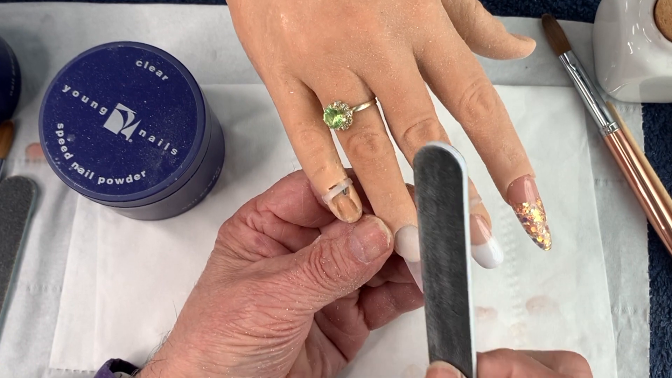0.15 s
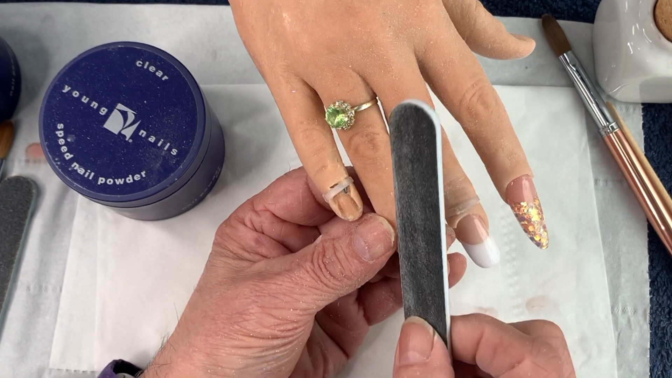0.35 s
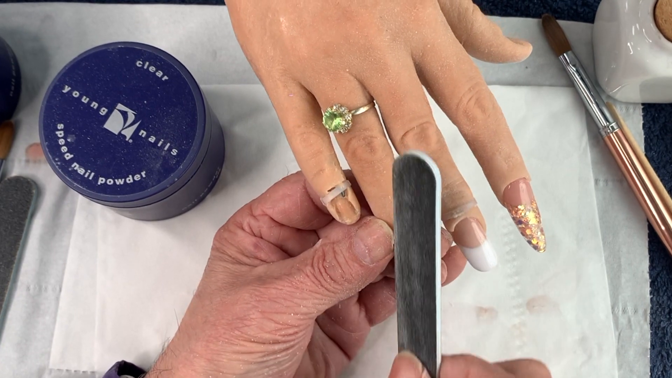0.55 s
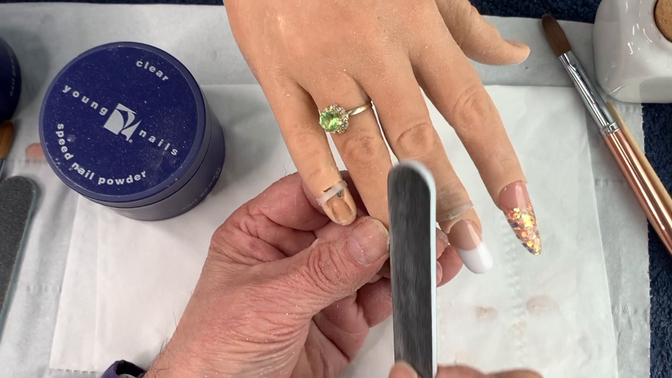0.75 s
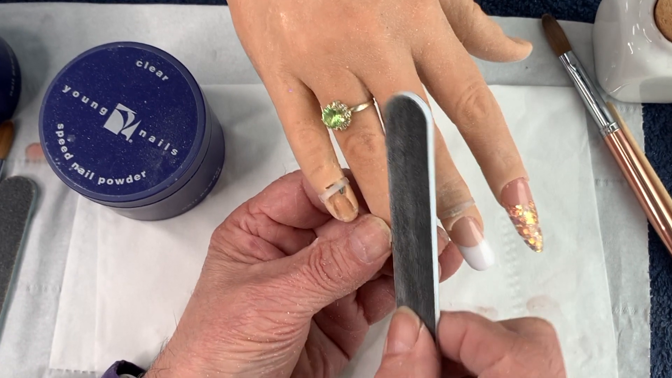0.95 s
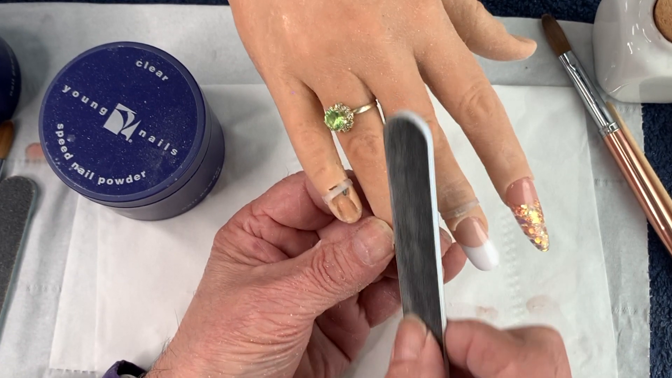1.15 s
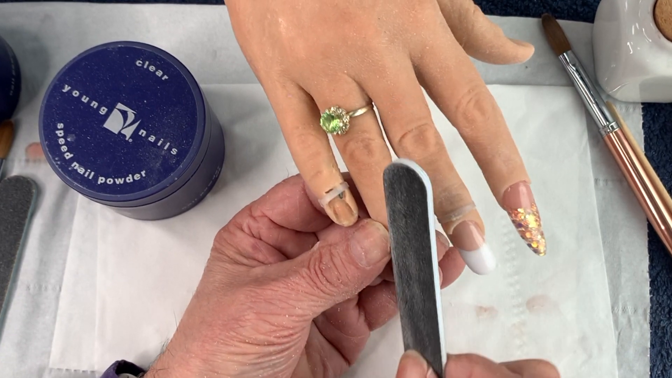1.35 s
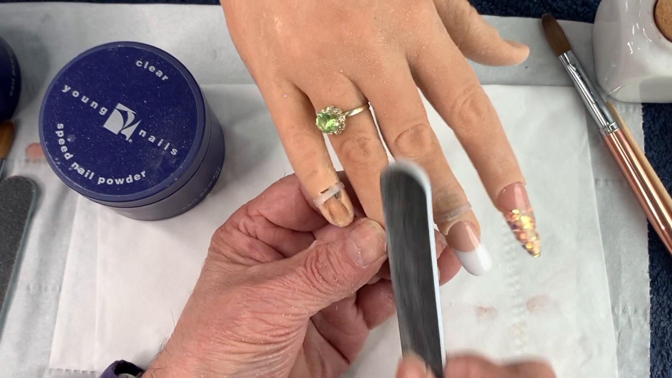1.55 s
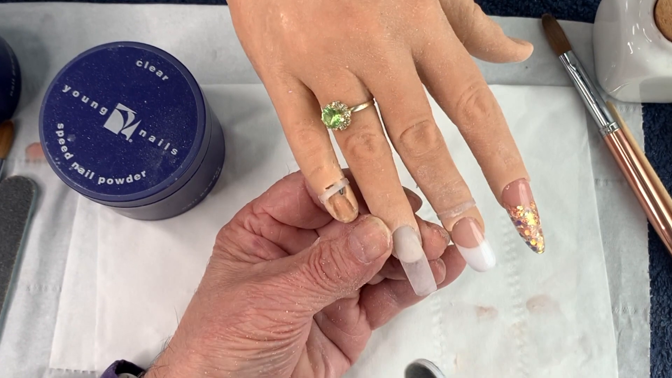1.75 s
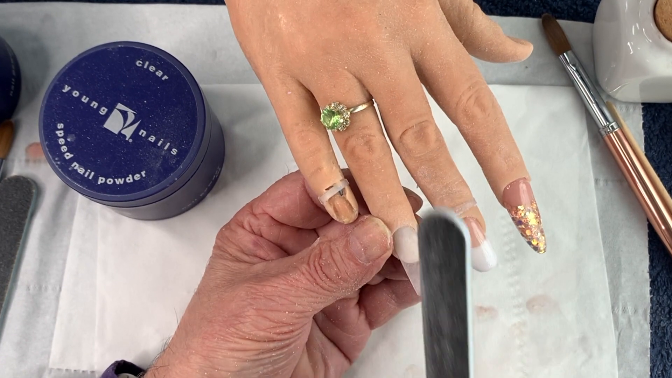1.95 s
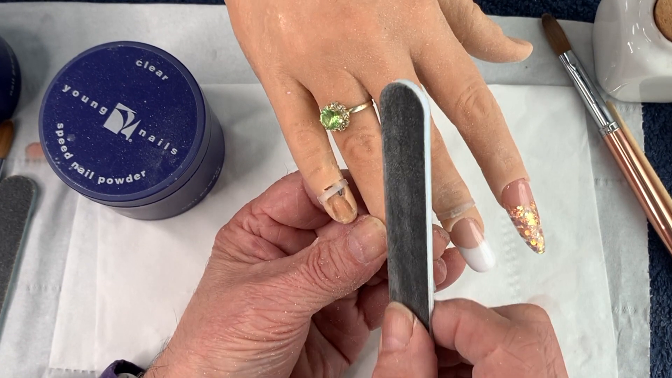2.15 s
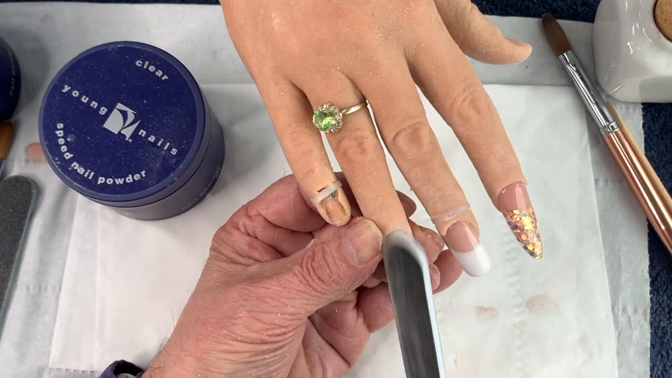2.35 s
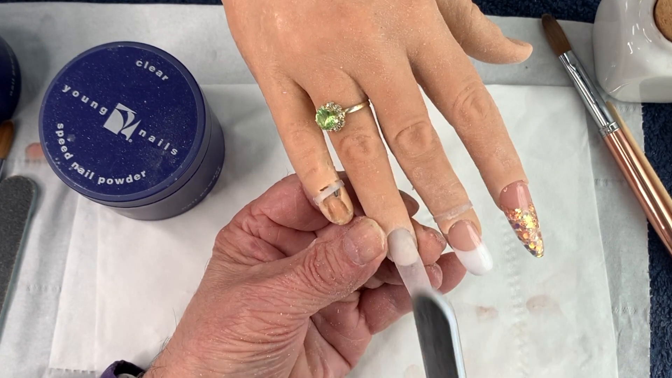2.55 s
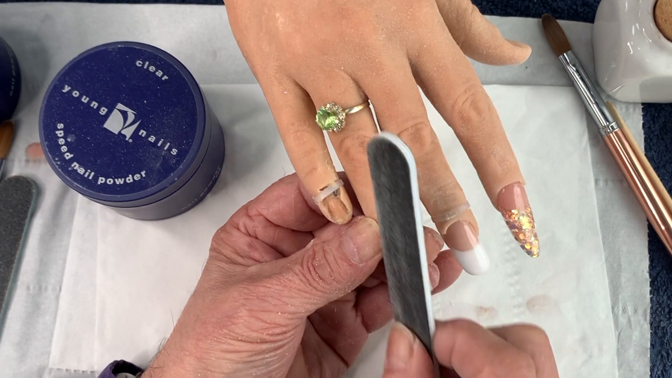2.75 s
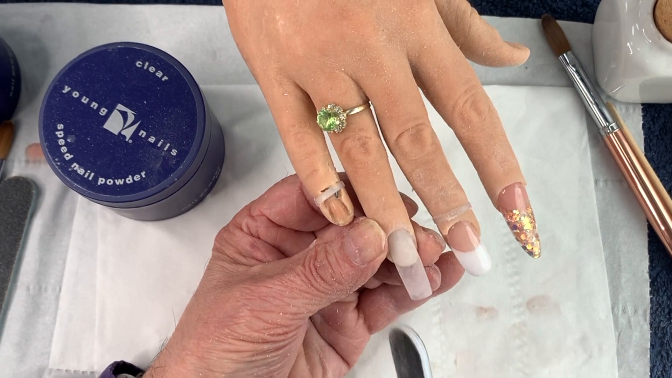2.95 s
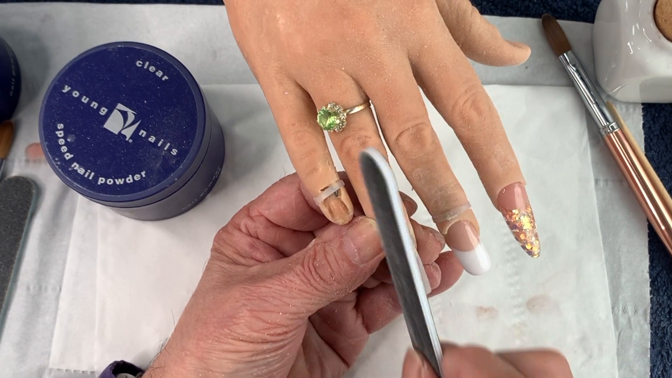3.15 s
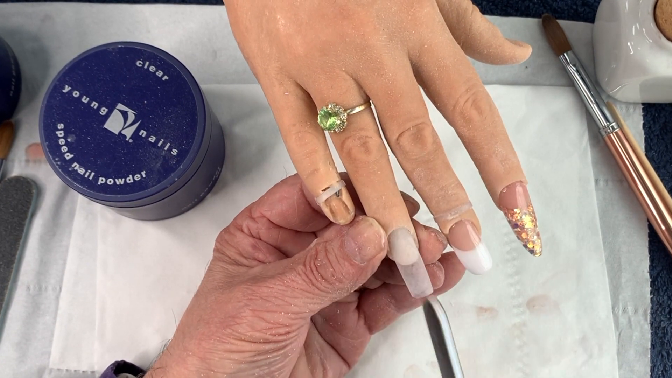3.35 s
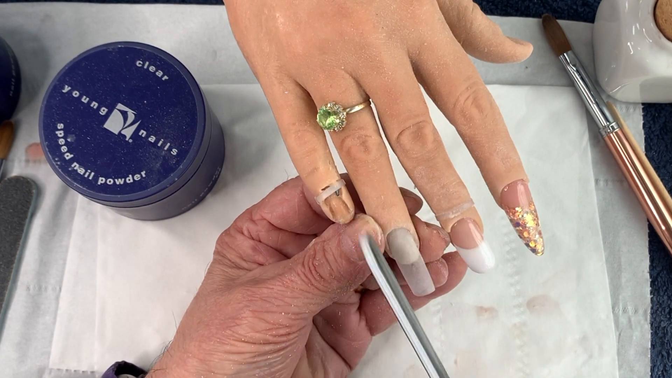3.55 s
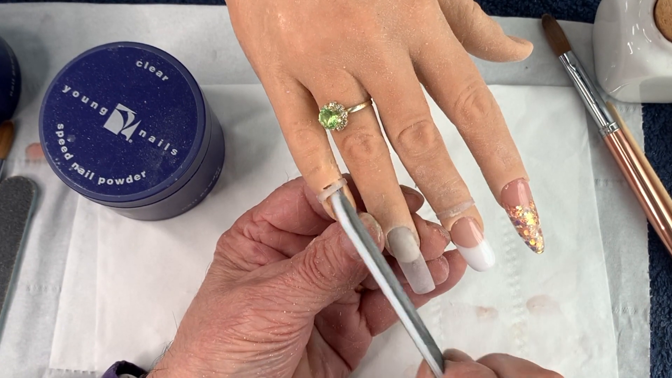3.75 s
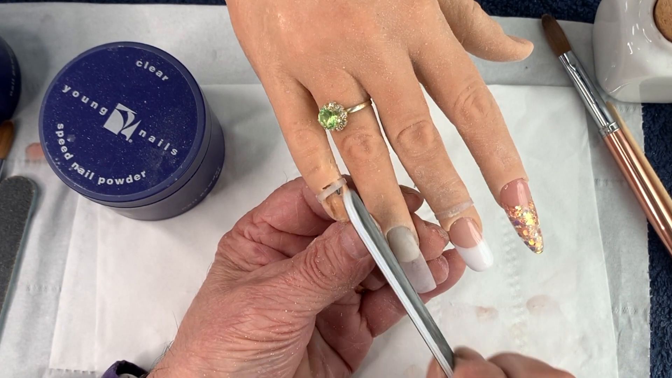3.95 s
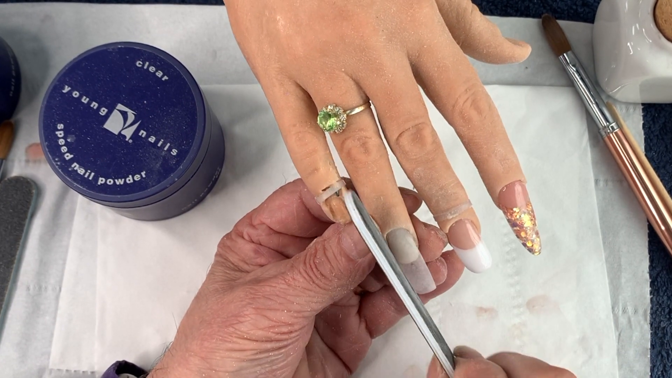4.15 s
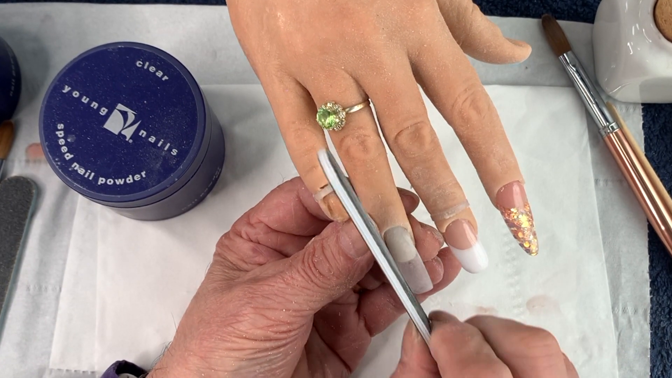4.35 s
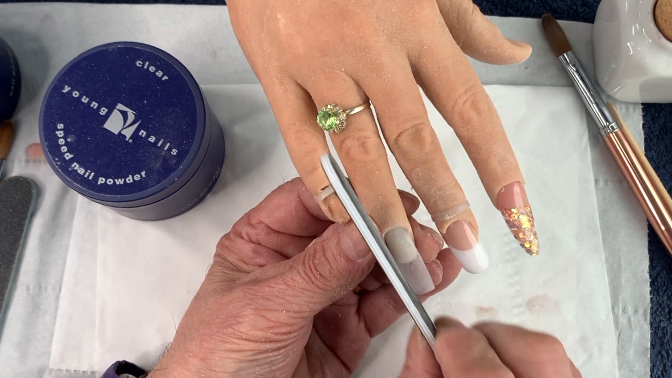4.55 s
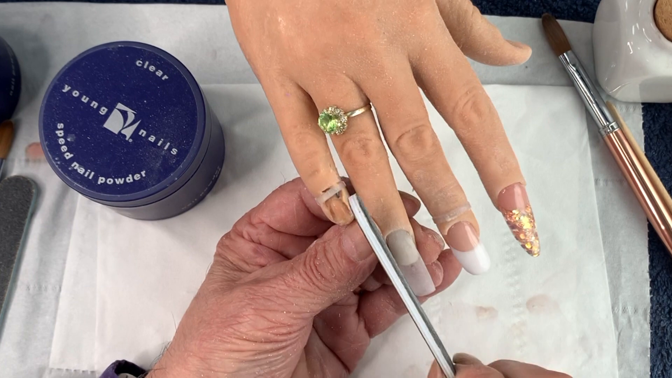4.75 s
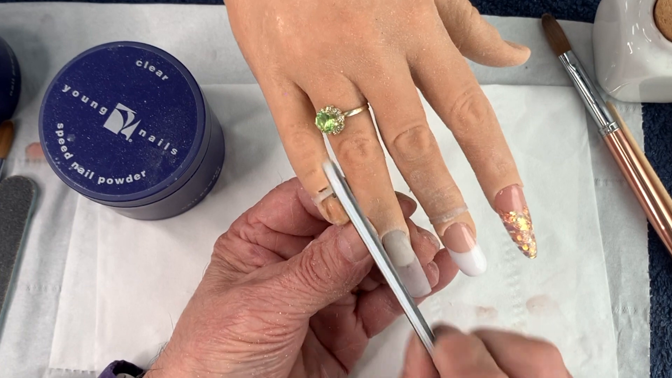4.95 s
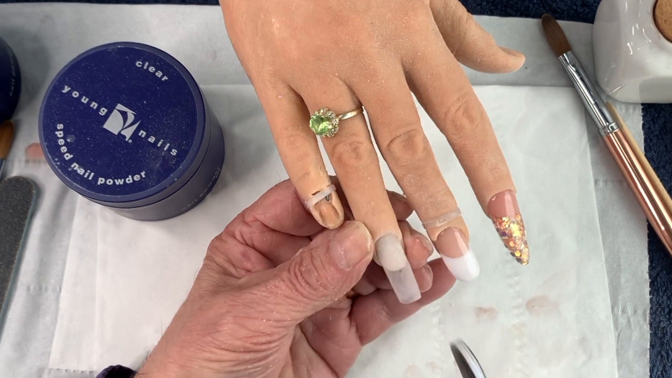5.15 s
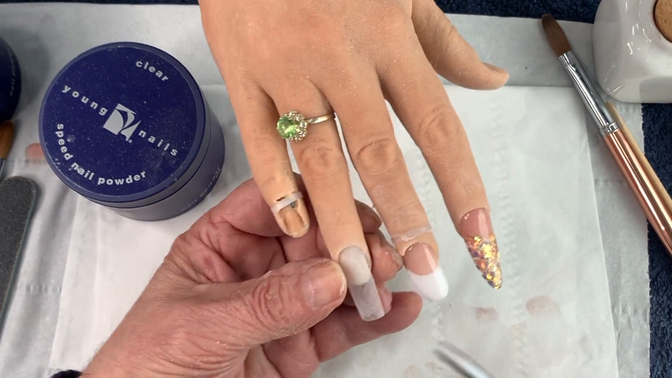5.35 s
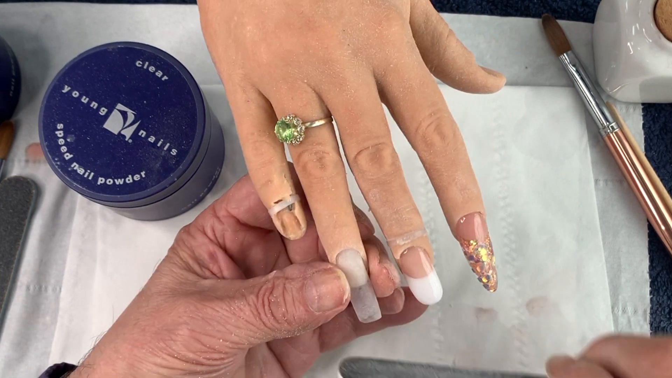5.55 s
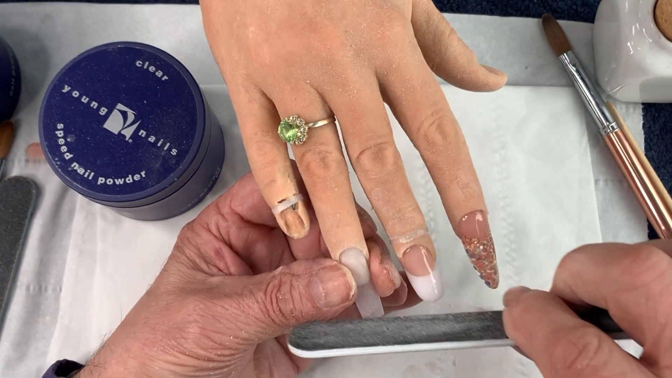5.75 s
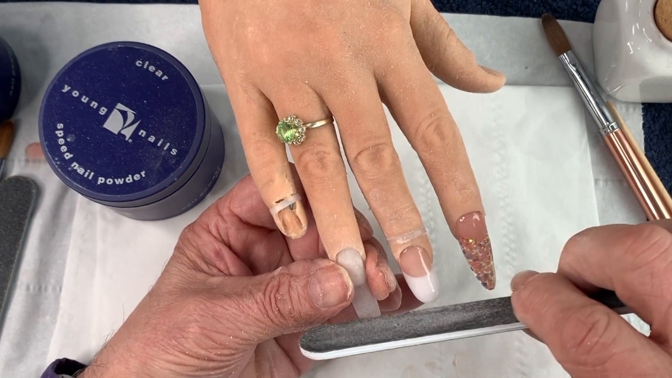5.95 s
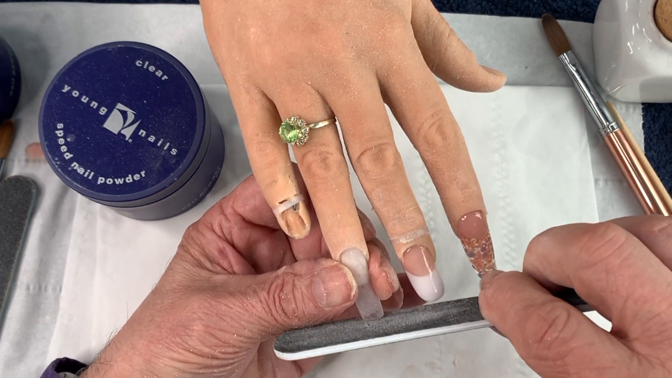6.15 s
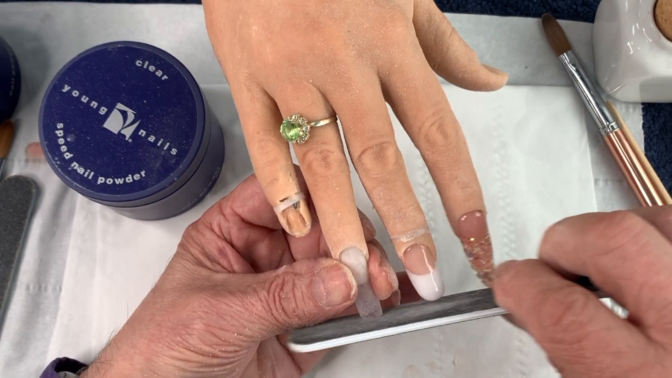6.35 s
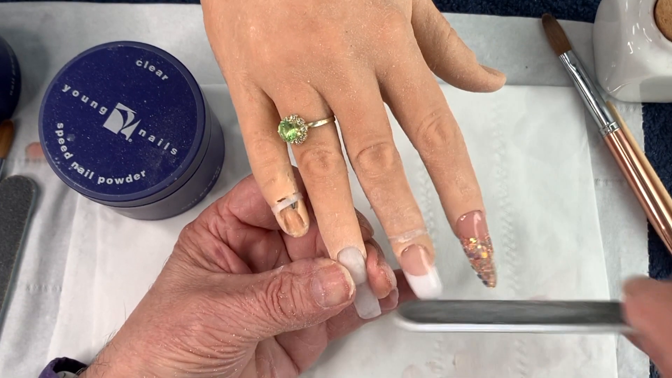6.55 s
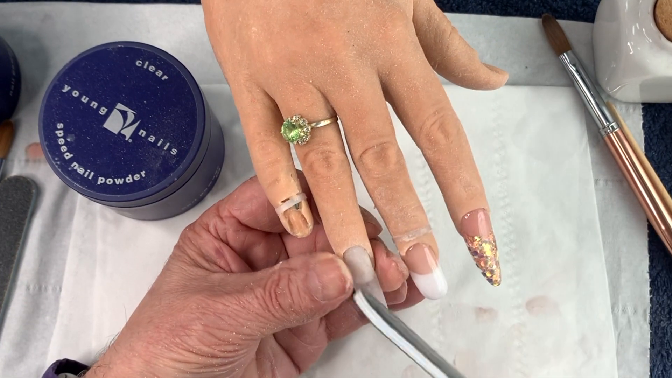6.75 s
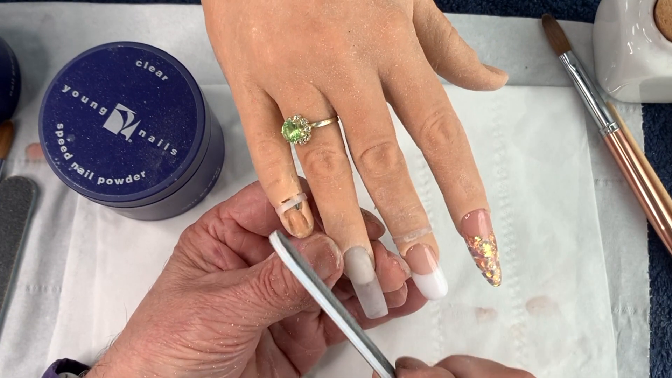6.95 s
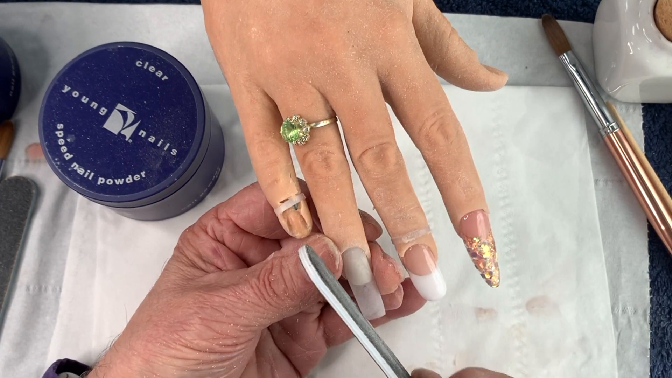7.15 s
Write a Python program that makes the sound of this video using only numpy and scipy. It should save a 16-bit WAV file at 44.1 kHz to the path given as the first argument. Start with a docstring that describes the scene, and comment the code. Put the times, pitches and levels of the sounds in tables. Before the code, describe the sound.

An emery board rasps quickly back and forth on an acrylic nail, with soft knocks from the practice hand's finger. The run ends in a sharp little snap, and three separate sweeps follow. A second quick run builds, then skin rubs briefly, and a few more strokes scratch at the tip, the last ones very light. The microphone is close, in a small room with faint traffic drone, rumble and hiss.

```python
"""Filing an acrylic nail

An emery board files a nail on a practice hand, close to two microphone ports in a small room.
Grit scratches in quick strokes, snaps, and chatters at the edge; the finger knocks softly at turns.
Skin rubs on rubber and board between runs. Traffic drones through the walls, over low rumble and hiss."""
import sys
import numpy as np
from scipy import signal
from scipy.fft import rfft, irfft, next_fast_len
from scipy.io import wavfile

SR = 44100
rng = np.random.default_rng(int(sys.argv[2]) if len(sys.argv) > 2 else 0)


def store_wav(level_fs):
    """Save 16-bit WAV to argv[1]."""
    pcm = np.round(np.clip(np.atleast_2d(level_fs), -1, 1) * 32767)
    wavfile.write(sys.argv[1], SR, pcm.T.astype(np.int16))


N = 317564
BAND_LIMIT_HZ = 15800
RIPPLE_HZ = np.linspace(0, BAND_LIMIT_HZ, 70)  # knots of a random ripple: the board's small modes
PUSH, PULL, SWEEP = "push", "pull", "sweep"  # a sweep runs off the nail

# Engines. Each row: time in seconds, firing rate in Hz, fundamental in dB, overtones in dB.
ENGINES = [(0, 88.54, -75, -69), (.55, 92.33, -67.5, -63.5), (1.15, 93.8, -79, -66.5),
           (1.45, 85.36, -64.5, -67), (1.9, 69.97, -81, -74.5), (3.5, 74.46, -77, -77.5),
           (4.4, 77.36, -72, -78.5), (5.35, 72.24, -76.5, -73.5), (5.8, 69.83, -81, -65.5),
           (6.3, 66.5, -91, -71), (7.2, 67.8, -85.5, -78.5)]
# Spectra of the low rumble and the faint background hiss. Each row: frequency in Hz, gain in dB.
RUMBLE_SPECTRUM = [(25, -34), (40, -19.5), (55, -9), (80, -11.5), (102, -22), (126, -9), (226, 1),
                   (323, -11), (356, -6), (390, -14.5), (540, -23.5), (750, -25), (1200, -37), (2600, -71)]
HISS_SPECTRUM = [(400, 7.5), (800, 3), (1500, -1.5), (3000, -4), (4300, -11), (5500, -17.5), (10000, -21),
                 (15500, -26.5)]
# Low rumble, with a soft thud near 5.3 s as the practice hand shifts.
# Each row: time in seconds, relative level in dB.
RUMBLE_LEVEL = [(0, -67), (1.3, -63), (1.9, -69.5), (4.2, -68.5), (5.3, -65), (5.8, -70.5), (7.2, -70)]
# The hiss rises after the strokes and fades in pauses. Each row: time in seconds, level in dB.
HISS_LEVEL = [(0, -72), (1.7, -69.5), (2.1, -78.5), (3.3, -73), (3.7, -76.5), (5.4, -71.5), (5.8, -80.5),
              (6.1, -82.5), (6.7, -76), (7.2, -92)]
# Background noise between the ports. Each row: frequency in Hz, coherence from 0 to 1.
COHERENCE = [(60, 1), (150, 0.998), (300, .8), (600, 0.084), (2000, 0.16), (8000, 0.1)]
# File strokes. Each row: start and end in seconds, relative level in dB, motion.
STROKES = [(0.188, .36, -69.5, PULL), (0.357, 0.493, -43.5, PUSH), (0.509, 0.613, -43, PULL),
           (0.638, 0.745, -41, PUSH), (0.769, 0.885, -38, PULL), (.907, 1.028, -41, PUSH),
           (1.046, 1.156, -40.5, PULL), (1.183, 1.295, -43.5, PUSH), (1.322, 1.422, -43, PULL),
           (1.464, 1.607, -34, SWEEP), (2.181, 2.385, -38.5, SWEEP), (2.699, 2.887, -38.5, SWEEP),
           (3.137, 3.317, -38, SWEEP), (3.721, 3.836, -56.5, PUSH), (3.848, 4.03, -48, PULL),
           (4.023, 4.16, -49, PUSH), (4.164, 4.296, -44, PULL), (4.3, 4.431, -46, PUSH),
           (4.445, 4.585, -42.5, PULL), (4.574, 4.727, -42.5, PUSH), (4.737, 4.868, -42, PULL),
           (4.885, 5.053, -37, SWEEP), (6.158, 6.266, -47, PUSH), (6.27, 6.382, -47, PULL),
           (6.378, 6.535, -40, PUSH), (7.034, 7.154, -55.5, PUSH), (7.161, 7.266, -57, PULL)]
# Each motion: share elapsed at top speed, speed exponent, rasp in dB, treble in dB, glide in octaves.
# The grip's swing scales the last three.
MOTIONS = {PUSH: (0.56, 2, -0.5, -1, 0.01), PULL: (.48, 1.11, -2.2, 1.1, .2),
           SWEEP: (0.8, 0.37, -1, 0.5, -0.12)}
# Where the file lies on the nail. Each row: start in seconds, grip.
GRIP_TIMES = [(0, "top"), (3, "side"), (6, "tip")]
# Each grip: board's ring in Hz, ring gain in dB, swing factor, knock tilt in dB per octave.
GRIPS = {"top": (2300, -2, .9, 1), "side": (3724, 1.5, 1.8, -3.5), "tip": (2500, -2.5, 0.64, -2.5)}
# Rasp of the nail by grip. Each row: frequency in Hz, gain in dB.
TOP_SPECTRUM = [(300, -32), (900, -23.5), (1450, -20), (1950, -6), (2700, -6), (3200, -3), (4250, -0.5),
                (4950, -4.5), (5700, -5), (6700, -3.5), (7600, -8.5), (11500, 0), (13500, -6),
                (15600, -19.5)]
SIDE_SPECTRUM = [(300, -22.5), (900, -26), (1450, -27), (1950, -10.5), (2700, -12.5), (3200, -11),
                 (4250, -1), (4950, -5.5), (5700, -6), (6700, -9), (7600, -17), (11500, -4.5), (13500, -15),
                 (15600, -23.5)]
TIP_SPECTRUM = [(300, -17), (680, -9.5), (920, -14.5), (1250, -17), (1600, -12), (2050, -1.5), (2700, 1.5),
                (3300, -3.5), (4250, -3), (4950, -8.5), (5700, 0), (7600, -5), (13000, -1), (15600, -16.5)]
# Grit snaps and touchdowns. Each row: time in seconds, relative peak in dB, treble in dB.
SNAPS = [(0.216, -60, -21), (.378, -48, 3), (1.6159, -14.5, 10), (3.1534, -36, -18), (3.1869, -32.5, -19),
         (3.2754, -21.5, 3), (3.2992, -17, 1), (3.53, -55, -3), (3.5492, -59, -0.5), (4.9936, -32, -2),
         (5.9415, -55, -4), (6.4225, -28.5, -6), (6.5096, -29, -.5)]
# The finger rocks as the file turns. Each row: time in seconds, relative peak in dB.
KNOCKS = [(0.527, -53.5), (0.785, -44.5), (0.881, -47.5), (1.062, -41.5), (1.15, -44.5), (1.195, -41.5),
          (1.251, -47.5), (1.337, -49), (1.412, -50), (1.464, -41), (3.708, -52.5), (4.175, -49),
          (4.456, -51), (4.752, -46.5), (4.896, -42.5)]
# Finger modes. Each row: frequency in Hz, relative level in dB, T60 in seconds.
FINGER_MODES = [(400, 1, 0.0403), (466.4, -4.5, 0.027), (609.6, -2.5, 0.035), (765, -1, 0.05),
                (1000, -8.5, 0.013), (1290, -5, 0.026), (1700, -11, 0.015)]
# Edge chatter. Each row: start and end in seconds, relative level in dB, flex depth in dB.
CHATTERS = [(1.595, 1.627, -32, -4), (2.338, 2.365, -36.5, -3), (2.819, 2.852, -38, 4),
            (3.111, 3.147, -58, 2), (3.243, 3.288, -39.5, 4.5), (5.002, 5.019, -35, -1),
            (6.452, 6.522, -45, 18)]
# Finger slides. Each row: start and end in seconds, relative level in dB, brightness in dB.
RUBS = [(2.638, 2.724, -67.5, 8), (5.114, 5.25, -68, -5), (5.217, 5.25, -55, 1), (5.24, 5.284, -45, 6),
        (5.268, 5.391, -66, -23), (5.315, 5.409, -58, 3.5), (5.681, 5.76, -72.5, -15)]
# Sliding skin. Each row: frequency in Hz, gain in dB.
SKIN_SPECTRUM = [(400, -4), (1200, -13), (1800, -4), (3000, -12.5), (6000, -3), (10500, 6), (15500, -5.5)]
# Phase between ports. Each row: frequency in Hz, left lead in radians.
PORT_PHASE = [(100, 0), (1600, .1), (2600, 1.5), (3200, 1.1), (4300, 1.05), (5100, 3), (6300, 4.6),
              (7700, 6.2), (8800, 6.35), (11900, 9.3), (13000, 9.5), (15400, 12.5)]
# Balance between ports. Each row: frequency in Hz, left minus right in dB.
PORT_BALANCE = [(300, -8.5), (1600, 0.5), (2600, -6), (4100, -1), (5000, -3.5), (5800, 0), (15000, 0)]
# Room decay. Each row: frequency in Hz, T60 in seconds.
ROOM_T60 = [(300, 0.58), (1500, 0.32), (2800, 0.22), (3900, 0.35), (5000, .3), (9000, 0.2107),
            (15000, 0.0953)]


def amp(db):
    """Decibels to gain."""
    return 10 ** (np.asarray(db) / 20)


def unit_rms(x):
    """Scale to rms 1."""
    return x / np.sqrt(np.mean(x ** 2) + 1e-20)


def at_hz(points, hz):
    """Interpolate on a log frequency axis."""
    knots_hz, values = np.transpose(points)
    return np.interp(np.log(hz + 1), np.log(knots_hz), values)


def curve(rows, column=1):
    """A time table's column at every sample."""
    rows = np.array(rows)
    return np.interp(np.arange(N) / SR, rows[:, 0], rows[:, column])


def add(mix, start_s, sound):
    """Mix a sound in at start_s."""
    part = mix[max(round(start_s * SR), 0):][:len(sound)]
    part += sound[:len(part)]


def wobble(size, cutoff_hz):
    """Low-passed noise, rms about 1."""
    span = next_fast_len(size + SR)
    hz = np.fft.rfftfreq(span, 1 / SR)
    spectrum = rfft(rng.standard_normal(span)) / (1 + (hz / cutoff_hz) ** 4)
    return unit_rms(irfft(spectrum, span))[:size]


def colour(x, response_db, size=2048):
    """Minimum-phase filter: each click rings after it lands."""
    log_gain = np.log(amp(response_db(abs(np.fft.fftfreq(size, 1 / SR)))))
    taps = np.fft.ifft(np.exp(np.conj(signal.hilbert(log_gain)))).real
    return signal.fftconvolve(x, taps[:size // 2])[:len(x)]


def resonate(x, hz, width_hz):
    """Unity-gain resonance following the curve hz."""
    carrier = np.exp(2j * np.pi * np.cumsum(hz) / SR)
    pole = np.exp(-np.pi * width_hz / SR)
    return 2 * (carrier * signal.lfilter([1 - pole], [1, -pole], x / carrier)).real


def grip_at(time_s):
    """The grip held at time_s."""
    return [grip for since_s, grip in GRIP_TIMES if since_s <= time_s][-1]


def diffuse_noise(spectrum):
    """Stereo noise, nearly alike at both ports in the bass."""
    hz = np.fft.rfftfreq(N, 1 / SR)
    left, independent = rfft(rng.standard_normal((2, N)))
    coherence = at_hz(COHERENCE, hz)
    right = coherence * left + np.sqrt(1 - coherence ** 2) * independent
    return unit_rms(irfft(np.array([left, right]) * amp(at_hz(spectrum, hz)), N))


def traffic(waver=0.0084, flutter_db=2, third_db=-3.5):
    """Wavering engine harmonics, muffled by walls."""
    cycles = np.cumsum(curve(ENGINES) * (1 + waver * wobble(N, 10))) / SR
    boom_db, overtone_db = curve(ENGINES, column=2), curve(ENGINES, column=3)
    drone = np.zeros(N)
    for harmonic, db in enumerate([boom_db, overtone_db, overtone_db + third_db], 1):
        rms = amp(db + flutter_db * wobble(N, 10))
        drone += rms * np.sqrt(2) * np.sin(2 * np.pi * harmonic * cycles)
    return drone * amp([[-0.9], [0.9]])


def background(rumble_gain_db=1.5):
    """Low rumble and faint hiss, each following its level table."""
    rumble = amp(curve(RUMBLE_LEVEL) + rumble_gain_db) * diffuse_noise(RUMBLE_SPECTRUM)
    hiss = amp(curve(HISS_LEVEL)) * diffuse_noise(HISS_SPECTRUM)
    return rumble * amp([[-0.9], [0.9]]) + hiss


def contact_db(hz, rasp_db, treble_db):
    """The contact point shifts weight between the board's low rasp and the grit's fizz."""
    rasp_band = at_hz([(500, 0.75), (2500, 0.974), (3500, 0.02)], hz)
    treble_band = at_hz([(5500, 0), (8500, 1)], hz)
    return rasp_db * rasp_band + treble_db * treble_band


def scrape(start_s, end_s, spectrum, rasp_db, treble_db, *, grains_per_s, spread_db,
           judder_db, judder_hz, ripple_db, peak_share=0.45, speed_exponent=1,
           glide_oct=0, ring_hz=2400, ring_db=-2):
    """Grains hit harder and more often with speed, ringing a board whose free length changes."""
    t = np.arange(start_s, end_s + 0.012, 1 / SR)
    fastest_s = start_s + peak_share * (end_s - start_s)
    speed = np.sin(np.pi * np.interp(t, [start_s, fastest_s, end_s], [0, 0.5, 1]))
    travel = np.cumsum(speed) / speed.sum()
    pressure = np.minimum((t - start_s) / (0.15 * (t[-1] - start_s)), 1)
    hits = rng.random(len(t)) < grains_per_s / SR * (0.25 + 0.75 * speed)
    grit = hits * rng.choice([-1, 1], len(t))
    grit = grit * amp(spread_db * np.minimum(rng.exponential(1, len(t)), 4))
    grit *= amp(judder_db * wobble(len(t), judder_hz))  # stick-slip
    rasp = np.zeros(len(t))
    for place in np.linspace(0, 1, 5):  # crossfaded spots along the board
        nearness = np.maximum(1 - 4 * abs(travel - place), 0)
        modes_db = ripple_db * rng.standard_normal(len(RIPPLE_HZ))
        shift_oct = [(1500, glide_oct * (place - 0.4)), (7000, 0)]  # only low modes slide

        def response_db(hz):
            body_db = at_hz(spectrum, hz / 2 ** at_hz(shift_oct, hz))
            return body_db + contact_db(hz, rasp_db, treble_db) + np.interp(hz, RIPPLE_HZ, modes_db)

        rasp += colour(grit * nearness, response_db)
    bending_hz = ring_hz * 2 ** (glide_oct * travel - max(glide_oct, 0))
    ring = amp(ring_db) * resonate(rasp, bending_hz, width_hz=110)
    return unit_rms(rasp + ring) * pressure * speed ** speed_exponent


def filing(gain_db=-2, light_touch_db=-46.5):
    """Even strokes of fine grit; a light touch loses its fizz."""
    out = np.zeros(N)
    spectra = {"top": TOP_SPECTRUM, "side": SIDE_SPECTRUM, "tip": TIP_SPECTRUM}
    for start_s, end_s, db, motion in STROKES:
        grip = grip_at(start_s)
        peak_share, speed_exponent, rasp_db, treble_db, glide_oct = MOTIONS[motion]
        ring_hz, ring_db, swing, _ = GRIPS[grip]
        dull_db = np.clip(1.6 * (db - light_touch_db), -24, 0)
        stroke = scrape(start_s, end_s, spectra[grip], swing * rasp_db, swing * treble_db + dull_db,
                        grains_per_s=17000, spread_db=2.4, judder_db=1.1, judder_hz=160, ripple_db=3,
                        peak_share=peak_share, speed_exponent=speed_exponent,
                        glide_oct=swing * glide_oct, ring_hz=ring_hz, ring_db=ring_db)
        add(out, start_s, amp(db + gain_db) * stroke)
    return out


def grit_snaps(gain_db=-1, decay_s=0.00082, rasp_db=3):
    """Tiny bursts of fractures sound through the nail."""
    out, t = np.zeros(N), np.arange(1024) / SR
    for start_s, db, treble_db in SNAPS:
        burst = rng.standard_normal(len(t)) * np.exp(-t / decay_s)
        snap = colour(burst, lambda hz: at_hz(TOP_SPECTRUM, hz) + contact_db(hz, rasp_db, treble_db))
        add(out, start_s, amp(db + gain_db) * snap / abs(snap).max())
    return out


def finger_knocks(gain_db=-1, scatter_db=3.2, rise_cycles=1.3, rattle_s=0.011):
    """The jointed finger rattles on its stop and rings in damped modes; low ones build last."""
    out, t = np.zeros(N), np.arange(SR // 8) / SR
    hz, mode_db, t60_s = np.transpose(FINGER_MODES)[:, :, None]
    rise = 1 - np.exp(-t * hz / rise_cycles)
    for start_s, db in KNOCKS:
        tilt_db = GRIPS[grip_at(start_s)][-1] * np.log2(hz / hz[0])
        strength, detune, phase = rng.standard_normal((3, len(FINGER_MODES), 1))
        envelope = rise * amp(mode_db + scatter_db * strength + tilt_db - 60 * t / t60_s)
        modes = envelope * np.sin(2 * np.pi * (hz * (1 + 0.026 * detune) * t + phase))
        blow = (t == 0) + 0.09 * rng.standard_normal(len(t)) * np.exp(-t / rattle_s)
        knock = signal.fftconvolve(modes.sum(0), blow)[:len(t)]
        add(out, start_s, amp(db + gain_db) * knock / abs(knock).max())
    return out


def edge_chatter(unflexed_hz=3000, sag_oct_per_db=0.05):
    """The board judders over the nail's edge: more flex, lower and duller."""
    out = np.zeros(N)
    for start_s, end_s, db, flex_db in CHATTERS:
        spectrum = TIP_SPECTRUM if grip_at(start_s) == "tip" else TOP_SPECTRUM
        shift_oct = -sag_oct_per_db * flex_db
        chatter = scrape(start_s, end_s, spectrum, rasp_db=flex_db, treble_db=-flex_db,
                         grains_per_s=6300, spread_db=3.5, judder_db=3, judder_hz=357, ripple_db=2.5,
                         speed_exponent=1.1, glide_oct=shift_oct,
                         ring_hz=unflexed_hz * 2 ** shift_oct, ring_db=0.65 * flex_db)
        add(out, start_s, amp(db) * chatter)
    return out


def skin_rubs(gain_db=-0.5):
    """Skin drags over rubber and board in short crackly slides."""
    out = np.zeros(N)
    for start_s, end_s, db, bright_db in RUBS:
        rub = scrape(start_s, end_s, SKIN_SPECTRUM, rasp_db=-0.6 * bright_db, treble_db=bright_db,
                     grains_per_s=3500, spread_db=3, judder_db=4, judder_hz=120, ripple_db=7.5)
        add(out, start_s, amp(db + gain_db) * rub)
    return out


def direct_path(x):
    """Sound reaches the left port first and bends round the microphone housing."""
    hz = np.fft.rfftfreq(N, 1 / SR)
    left_gain = amp(at_hz(PORT_BALANCE, hz) / 2) * np.exp(0.5j * at_hz(PORT_PHASE, hz))
    return irfft(rfft(x) * np.array([left_gain, 1 / left_gain]), N)


def desk_echoes(x, gain_db=-11, decay_s=0.0012, gap_s=0.0008):
    """Hands, jars and desk scatter quick echoes, different at each port."""
    t = np.arange(SR // 40) / SR
    taps = rng.standard_normal((2, len(t))) * np.exp(-t / decay_s) * (t > gap_s)
    taps /= np.linalg.norm(taps, axis=1, keepdims=True)
    return amp(gain_db) * signal.fftconvolve(x[None], taps, axes=1)[:, :N]


def room_tail(x, gain_db=-14, gap_s=0.0015):
    """Short diffuse stereo tail; treble dies first."""
    hz, t, noise = signal.stft(rng.standard_normal((2, SR * 3 // 4)), SR, nperseg=256)
    decay = amp(-60 * t / at_hz(ROOM_T60, hz)[:, None])
    _, tail = signal.istft(noise * decay, SR, nperseg=256)
    tail *= np.arange(tail.shape[1]) / SR > gap_s
    tail /= np.linalg.norm(tail[0])
    return amp(gain_db) * signal.fftconvolve(x[None], tail, axes=1)[:, :N]


def scene():
    """Desk work, its reflections, traffic and background noise."""
    work = filing() + edge_chatter() + skin_rubs() + grit_snaps() + finger_knocks()
    return direct_path(work) + desk_echoes(work) + room_tail(work) + traffic() + background()


def record(dry, highpass_hz=48):
    """Microphone bass roll-off and band limit."""
    highpass = signal.butter(3, highpass_hz, "highpass", fs=SR, output="sos")
    lowpass = signal.firwin(511, BAND_LIMIT_HZ, window=("kaiser", 9), fs=SR)
    return signal.oaconvolve(signal.sosfilt(highpass, dry), lowpass[None], "same")


dry = scene()
out = record(dry)
store_wav(out)
```